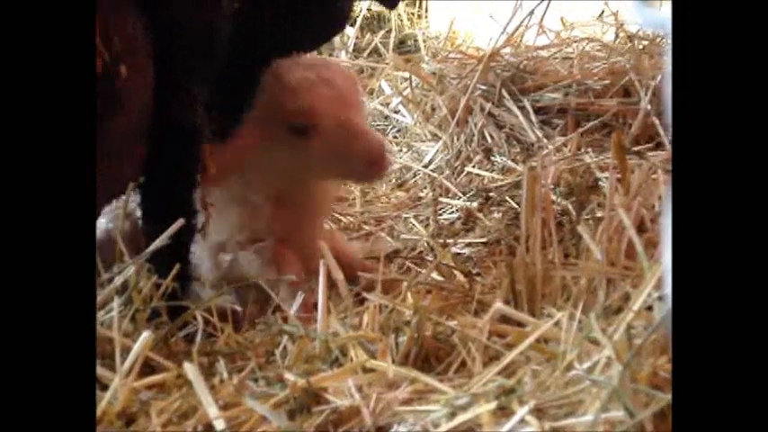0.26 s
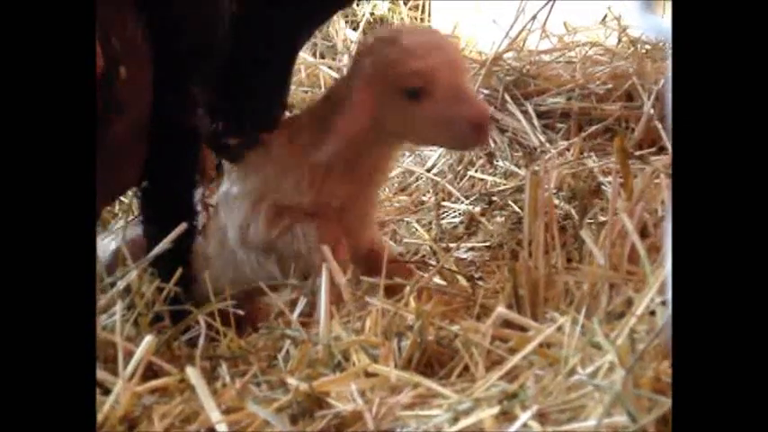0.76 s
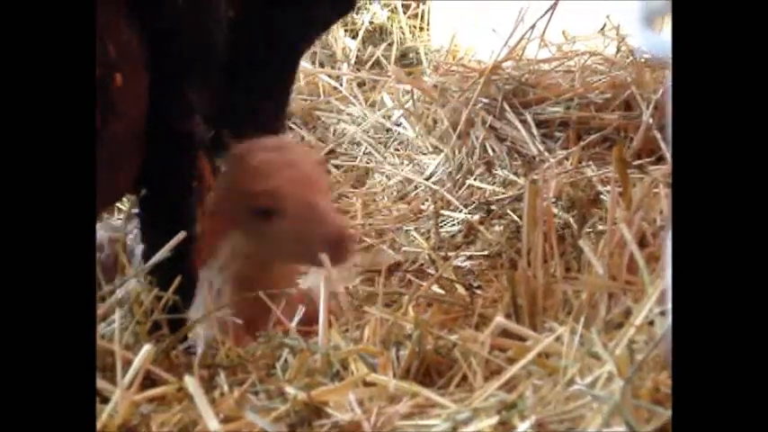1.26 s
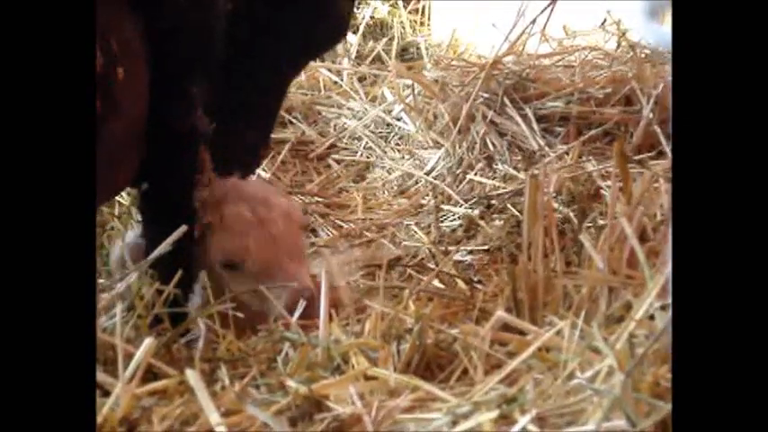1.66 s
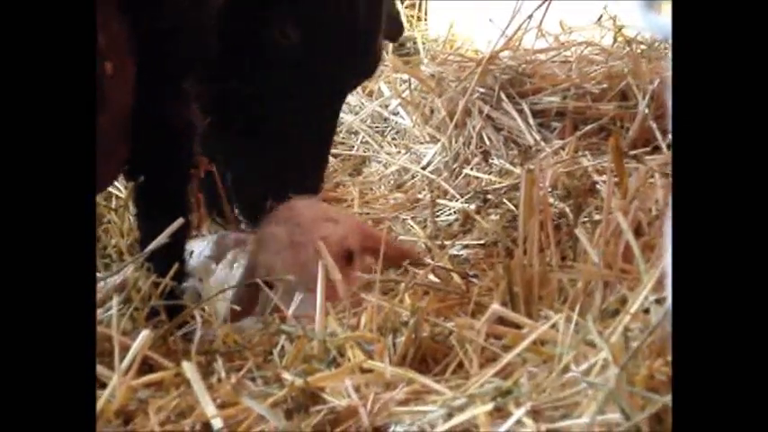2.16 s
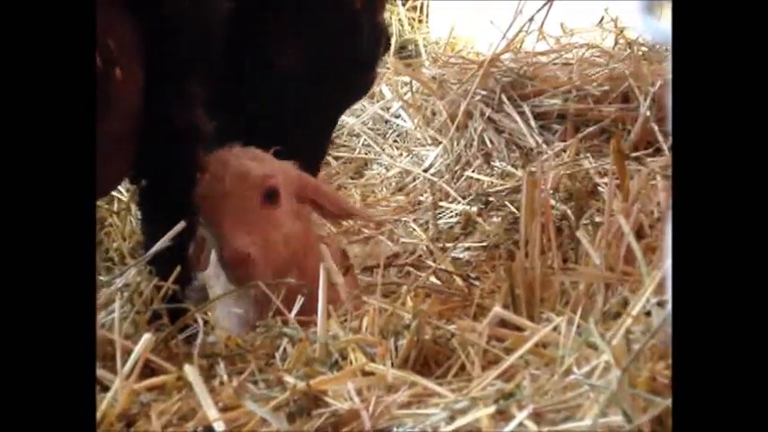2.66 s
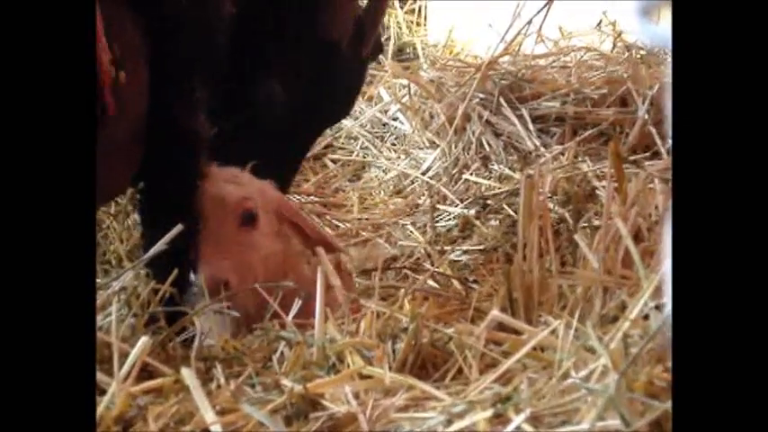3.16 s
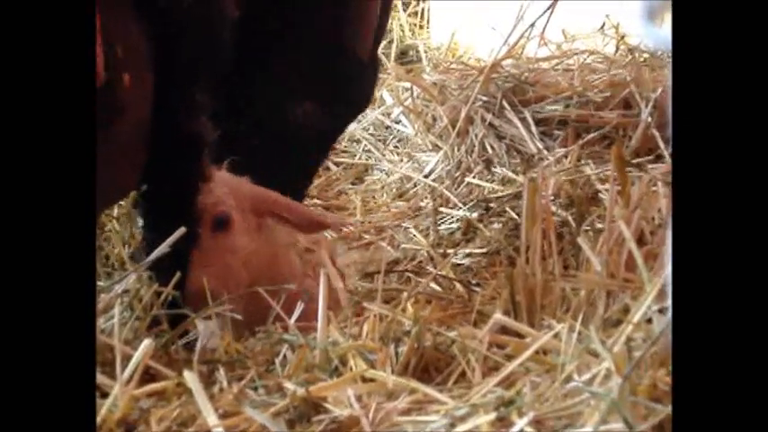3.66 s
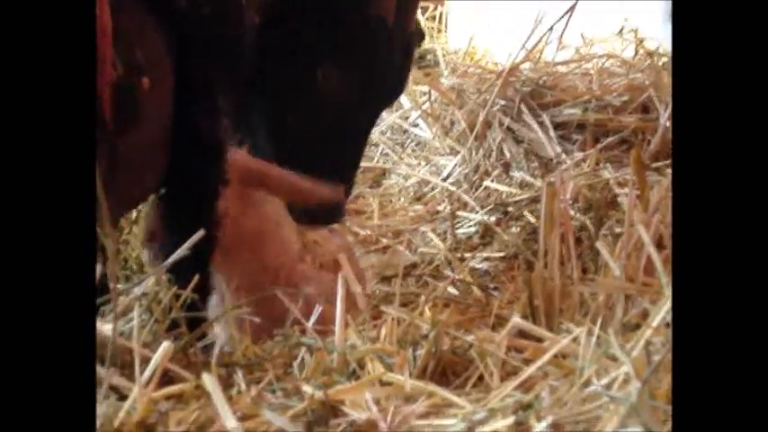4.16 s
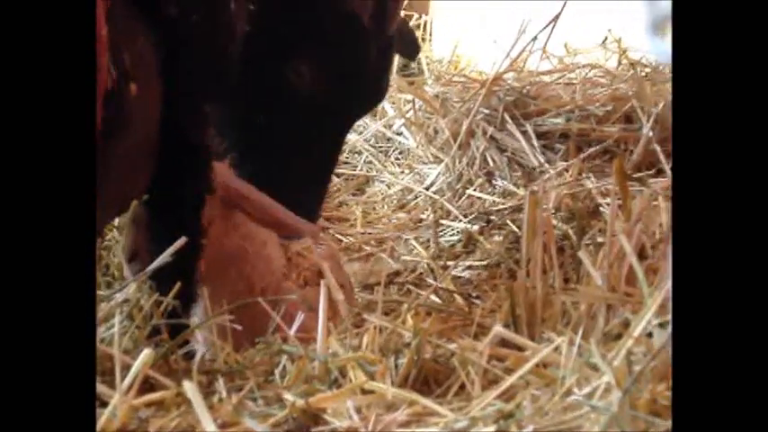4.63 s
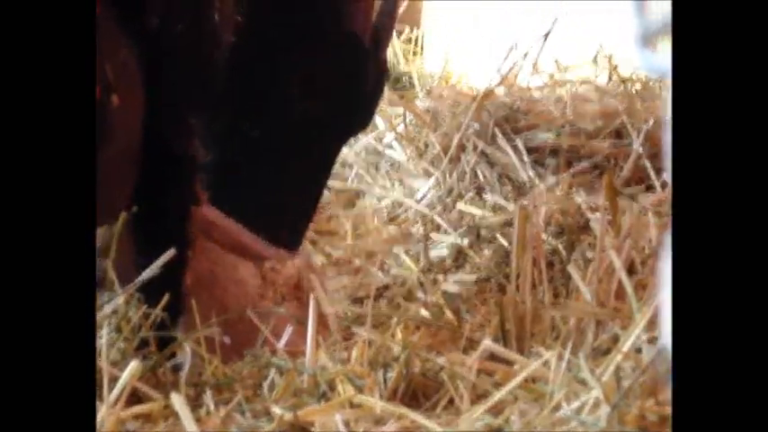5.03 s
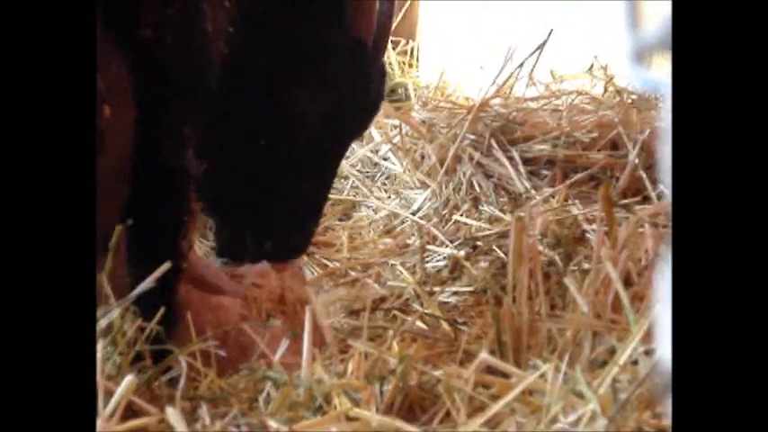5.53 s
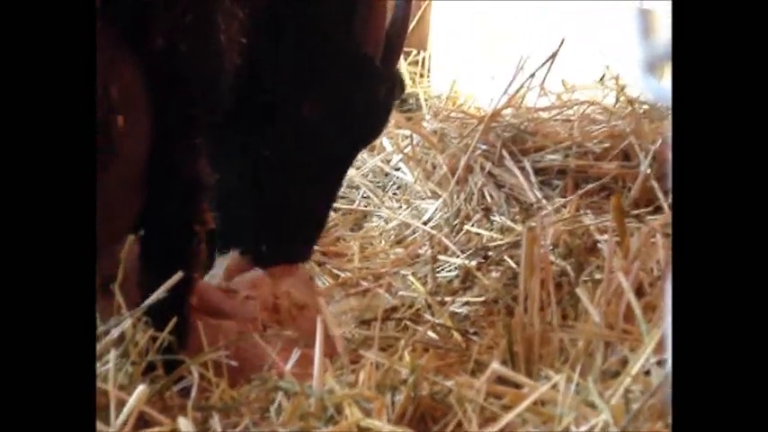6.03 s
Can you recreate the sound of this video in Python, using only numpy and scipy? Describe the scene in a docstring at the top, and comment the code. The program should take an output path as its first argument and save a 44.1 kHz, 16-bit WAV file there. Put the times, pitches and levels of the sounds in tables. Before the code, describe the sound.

In a straw-bedded barn, a quavering bleat comes from further off, then low grunts, straw ticks and a knock, then a loud close kid's bleat.

```python
"""A straw-bedded pen in a barn: a newborn kid bleats close by, after a quavering bleat from further off.
The bleats and short mews are vocal-fold partials shaped by mouth resonances; the mother's soft grunts are
slack pulses and puffs ringing chest and muzzle. Straw ticks and rustles as bursts and crackly noise, wood
knocks in two modes, dull taps run on, and a low sine thumps under the close call. A sparrow chirps outside
and a distant whine glides, both as tones; shaped noise gives the barn a steady hiss over a low hum."""
import sys
import numpy as np
from scipy import signal
from scipy.io import wavfile
from scipy.ndimage import uniform_filter1d

SR = 44100
rng = np.random.default_rng(int(sys.argv[2]) if len(sys.argv) > 2 else 0)


def log_audio(samples):
    """Write samples as a 16-bit WAV file to the path given in sys.argv[1]."""
    # one column per channel
    frames = np.atleast_2d(samples).T
    # limit to full scale, then quantise
    limited = np.clip(frames, -1, 1)
    pcm = np.round(limited * 32767).astype(np.int16)
    wavfile.write(sys.argv[1], SR, pcm)


N = 277477  # samples in the scene


def amp(db):
    """Decibels to gain."""
    return 10 ** (np.asarray(db) / 20)


def evened(x, axis=None):
    """Scaled to an rms of 1."""
    return x / np.sqrt(np.mean(x ** 2, axis, keepdims=True) + 1e-20)


def peaked(x):
    """Scaled to a peak of 1."""
    return x / abs(x).max()


def add(mix, s, sound):
    """Mixes a sound in at s seconds."""
    part = mix[round(s * SR):][:len(sound)]
    part += sound[:len(part)]


def curves(rows):
    """Sample times and the columns of a table, joined by straight lines."""
    s, *columns = np.transpose(rows)
    t = np.arange(s[0], s[-1], 1 / SR)
    return t, [np.interp(t, s, column) for column in columns]


def ring(x, hz, width_hz):
    """A resonance of gain 1 at its centre."""
    return signal.lfilter(*signal.iirpeak(hz, hz / width_hz, SR), x)


def wobble(length, hz, count=1):
    """Random drift with rms 1, smoothed over 1/hz seconds."""
    chance = rng.standard_normal((count, length))
    return evened(uniform_filter1d(chance, int(SR / hz), axis=1), axis=1)


def quavered(t, quaver, hz, effort_db):
    """Each push lifts pitch and effort together; between pushes the lowest partial fades."""
    s, strength = np.transpose(quaver)
    strength = np.interp(t, s, strength)
    cycles = np.interp(t, s, np.arange(len(s)))
    push = strength * np.tanh(2.5 * np.cos(2 * np.pi * cycles))
    lowest = amp(11 * (push - strength) + 6.0 * strength + 1.0)
    return hz * (1 + 0.062 * push), effort_db + 2.5 * push, lowest


def mouth_power(k, hz, tract, widths_hz, valley_db):
    """Power and phase lag that the resonances of mouth and throat give each partial."""
    power = lag = 0
    levels_db = [0] + tract[len(widths_hz):]
    for at, width, db in zip(tract, widths_hz, levels_db):
        detuning = (k * hz - at) / width
        # a floor between the resonances, falling above the third
        valley = amp(valley_db) ** 2 / k / (1 + (k * hz / tract[2]) ** 4)
        peak = 1 / (1 + detuning ** 2) ** 2 + valley
        lag = lag + np.arctan(detuning)  # each resonance turns the phase, so it rings after the pulse
        power = power + amp(db) ** 2 * peak / peak.sum(0)
    return power, lag


def bleat(rows, mouth, widths_hz, valley_db, rough, strain_db, drift_db, quaver=None):
    """Partials of the vocal folds, weighted by resonances that follow the mouth opening."""
    t, (effort_db, hz, opening) = curves(rows)
    tract = [np.interp(opening, np.arange(len(mouth)), column) for column in np.transpose(mouth)]
    k = np.arange(1, 25)[:, None]  # partial numbers
    lowest = amp(-5.0)  # a small mouth radiates the lowest partial poorly
    rough = np.minimum(rough + amp(effort_db - strain_db), 1)  # pushed hard, the voice turns raspy
    if quaver:
        hz, effort_db, lowest = quavered(t, quaver, hz, effort_db)
    turns = np.cumsum(hz * (1 + .015 * rough * wobble(len(t), 150)[0])) / SR
    power, lag = mouth_power(k, hz, tract, widths_hz, valley_db)

    # each partial's level drifts at random, the upper ones more
    drift = drift_db * np.minimum(k / 8, 1.6) * wobble(len(t), 22, count=len(k))
    power = power * amp(drift) ** 2
    size = np.sqrt(2 * power / power.sum(0)) * np.where(k == 1, lowest, 1)
    size = size / (1 + (k * hz / 11100.0) ** 6)  # treble roll-off

    # uneven closing smears the upper partials more than the lower
    smear = rough * np.minimum(k / 7, 1.5)
    size = size * (1 + smear * wobble(len(t), 500, count=len(k))) / np.sqrt(1 + smear ** 2)
    phase = 2 * np.pi * k * turns - 1.52 * lag - .2 * k ** 2
    sound = (size * np.cos(phase)).sum(0)
    fade = signal.windows.tukey(len(t), 0.027 / (t[-1] - t[0]))
    return t[0], amp(effort_db) * sound * fade


# the kid's call: [t/s, effort level/dB, pitch f/Hz, mouth opening as a mouth-shape row (0 = shut)]
KID_CALL = [(5.165, -36, 451.5, -0.5), (5.207, -28, 456.6, 0), (5.232, -37.5, 469, 1),
            (5.278, -26.5, 463.1, 1.5), (5.33, -28.5, 468.7, 1.37), (5.37, -24.5, 487, 1.9),
            (5.42, -21.5, 493.5, 2), (5.485, -21, 495.8, 2), (5.535, -19, 501.4, 3), (5.6, -13.5, 545.4, 4),
            (5.64, -13, 547.2, 4), (5.71, -14, 507.8, 5), (5.765, -14.5, 498.3, 5.5),
            (5.785, -20, 478.5, 5), (5.808, -13.5, 436, 6.5), (5.835, -35, 394.3, 1.5)]
# the kid's mouth, shut to wide with lips drawn back:
# [five resonances f/Hz, then level/dB of the upper four against the first]
KID_MOUTH = [(480, 1280, 2700, 4760, 8900, -15, -29, -28, -36),
             (910, 2680, 3400, 4560, 5300, 9, 6, -3.5, -16), (985, 2660, 3900, 5000, 6340, -9.5, 4, 0, -10),
             (1000, 3430, 4760, 6470, 6500, -11.5, -4.5, -14, -18),
             (1560, 2620, 3730, 5900, 6900, -1.5, 1, -5, -31),
             (1590, 2880, 4170, 6150, 7050, -5, -0.5, -4, -15),
             (1310, 2960, 4100, 6500, 7700, -5.5, -12, -12, -12.5)]


def kid_bleat():
    """The close call: five resonances open wide as the effort peaks."""
    return bleat(KID_CALL, KID_MOUTH, (200., 250., 330., 350., 450.),
                 valley_db=-24, rough=.05, strain_db=3, drift_db=3.5)


# short mews of the kid: [t/s, length/s, effort level/dB, first pitch f/Hz, last pitch f/Hz,
# mouth resonance f/Hz, level/dB of the three upper resonances against the first]
KID_MEWS = [(.135, 0.076, -35.5, 376, 400, 1290, -19, -5, -0.5),
            (.25, 0.089, -39, 467.5, 480, 940, -4, 9.5, 2),
            (5.04, 0.079, -28.5, 454, 493, 1324, 2.5, 5, 3.5)]
# upper resonances of a mew: [f/Hz]
MEW_UPPER = (2660, 4440, 6220)


def mew(s, length, effort_db, first_hz, last_hz, mouth_hz, *upper_db):
    """A bleat cut short with a fixed mouth: it swells and dies within a tenth of a second."""
    rows = [(s, effort_db, first_hz, 0), (s + length, effort_db, last_hz, 0)]
    mouth = [(mouth_hz, *MEW_UPPER, *upper_db)]
    s, sound = bleat(rows, mouth, (450., 600., 700., 900.),
                     valley_db=-14, rough=.2, strain_db=5, drift_db=2)
    return s, sound * np.sin(np.linspace(0, np.pi, len(sound))) ** 1.63


# a low thump under the loudest part of the close call: [t/s, starting level/dB, f/Hz, t60/s]
LOW_THUMP = (5.603, -35, 30., .25)


def thump(s, db, hz, t60):
    """A decaying low sine."""
    t = np.arange(0, t60, 1 / SR)
    return s, amp(db - 60 * t / t60) * np.sin(2 * np.pi * hz * t)


# the far call: [t/s, effort level/dB before the quaver, pitch f/Hz before the quaver,
# mouth opening as a mouth-shape row (0 = shut)]
FAR_CALL = [(.812, -46.5, 378.6, 0.43), (.93, -44.5, 367, 0.036), (1.0, -41.5, 379.7, 0),
            (1.03, -34.5, 392.3, 0.062), (1.09, -37, 387.5, 0.081), (1.125, -31.5, 384.6, 1.94),
            (1.35, -33.5, 377.1, 2.03), (1.46, -35.5, 363, 1.77), (1.5, -36.5, 344.4, 1.5),
            (1.66, -39.5, 328, 1.13), (1.7, -42, 305.5, 0.21), (1.74, -48, 285, 0.055),
            (1.8, -57, 275, 0.89)]
# the far mouth, shut, half open, wide:
# [four resonances f/Hz, then level/dB of the upper three against the first]
FAR_SHAPES = [(362, 1100, 3000, 3400, -13, -16.5, -18), (731, 1520, 2600, 3500, -5, -18, -24),
              (790, 1530, 2560, 3140, -4.5, -4, 1)]
# pushes of the quaver: [t/s, strength 0-1]
PUSHES = [(.87, 0.35), (.972, 0.8), (1.062, 0.7), (1.145, 1), (1.245, 1), (1.345, 0.9), (1.45, .9),
          (1.56, 0.6), (1.65, 0.2), (1.72, 0), (1.81, 0.)]


def far_bleat():
    """A rougher call with four resonances, its pitch and effort shaken by the quaver."""
    return bleat(FAR_CALL, FAR_SHAPES, (210., 250., 500., 550.),
                 valley_db=-19, rough=.36, strain_db=0, drift_db=1.8, quaver=PUSHES)


# the mother's grunts: [t/s, muzzle peak level/dB, chest level/dB against the muzzle, length/s]
MOTHER_GRUNTS = [(2.1, -40, -5.5, .06), (2.37, -28.5, 2.5, 0.074), (2.526, -26, -10, 0.066),
                 (2.671, -28, -15, 0.08), (4.047, -46.5, 7, 0.037), (4.779, -28.5, -4.5, 0.09),
                 (4.93, -24, -7, 0.081), (5.136, -32, -11, 0.029)]
# chest (first row, its level unused), then closed muzzle: [f/Hz, width of the narrower pass/Hz, level/dB]
CHEST_AND_MUZZLE = [(184, 51, 0), (400, 510, 8.5), (1000, 66, 5), (2310, 310, 5), (4190, 1100, 5),
                    (7420, 620, 0.5)]


def grunt(s, peak_db, chest_db, length):
    """Slack, uneven pulses with puffs of air ring the chest and the closed muzzle."""
    t = np.arange(0, length, 1 / SR)
    turns = np.cumsum(104 * (1 + 0.049 * wobble(len(t), 60)[0])) / SR + 0.81  # about 104 pulses a second
    pulses = np.diff(np.floor(turns), prepend=0)
    puffs = (.5 + np.exp(-(turns % 1) / 0.67)) * rng.standard_normal(len(t))
    drive = evened(pulses) + amp(-.4 * chest_db) * evened(puffs)  # the less chest, the more air
    (chest_hz, chest_width, _), *muzzle = CHEST_AND_MUZZLE
    chest = evened(ring(ring(pulses, chest_hz, chest_width), chest_hz, 2 * chest_width))
    upper = evened(sum(amp(db) * evened(ring(ring(drive, f, w), f, 3 * w)) for f, w, db in muzzle))
    shape = np.sin(np.pi * (t / length) ** 0.5)
    return s, amp(peak_db) * (peaked(shape * upper) + amp(chest_db) * peaked(shape * chest))


# a solid knock on wood: [t/s, peak level/dB]
WOOD_KNOCK = (3.4405, -18.5)
# modes of the board: [f/Hz, level/dB, t60/s]
BOARD_MODES = [(640, -0.5, 0.019), (2100, -5, 0.015)]


def knock(s, db):
    """A short blow rings two modes of a board."""
    t = np.arange(0, .04, 1 / SR)
    modes = sum(amp(d - 60 * t / t60) * np.sin(2 * np.pi * hz * t) for hz, d, t60 in BOARD_MODES)
    onset = np.minimum(t / .001, 1)
    return s, amp(db) * peaked(modes * onset)


# straw stalks snapping and small knocks: [t/s, snap peak level/dB, knock peak level/dB]
STRAW_TICKS = [(0.38, -30, -29), (0.7168, -32, -62), (0.9178, -61, -31), (1.8407, -33, -38.5),
               (3.4447, -28, -28.5), (3.986, -33, -34), (4.453, -41, -36), (4.47, -30, -34),
               (4.6557, -22, -42), (5.222, -30, -41)]


def tick(s, snap_db, knock_db):
    """A short bright snap and a longer, duller knock, both decaying noise through resonances."""
    t = np.arange(0, .04, 1 / SR)
    burst = rng.standard_normal(len(t))
    snap = peaked(ring(burst, 3460.0, 5000.0) * amp(-60 * t / 0.0093))
    dull = ring(ring(burst, 320.0, 920.0), 430.0, 1200.0)
    dull = peaked(dull * amp(-60 * t / 0.032))
    return s - .001, amp(snap_db) * snap + amp(knock_db) * dull


# a run of dull taps close by: [t/s, level/dB of the dull part]
DULL_TAPS = [(5.564, -33), (5.584, -33), (5.684, -41.5), (5.797, -39), (5.844, -41.5), (5.876, -46.5),
             (5.905, -46), (5.958, -52.5), (5.98, -45), (6.026, -44), (6.072, -46), (6.112, -47.5),
             (6.156, -44), (6.257, -40)]


def tap(s, db):
    """A broad dull click with a little treble, from one decaying noise burst."""
    t = np.arange(0, .03, 1 / SR)
    burst = rng.standard_normal(len(t)) * amp(-60 * t / 0.028)
    dull = evened(ring(ring(burst, 420.0, 1030.0), 680.0, 3380.0))
    return s - .002, amp(db) * (dull + 0.049 * evened(burst))


def noise(spectrum, patchy_db, flicker_db, size):
    """Random short-time spectra with drifting patches and a flicker shared by all bands."""
    frames, hz = 4 * N // size + 5, np.fft.rfftfreq(size, 1 / SR)
    a, b, patches = rng.standard_normal((frames, len(hz), 3)).T
    patches = uniform_filter1d(patches, size=10, axis=0)
    patches = evened(uniform_filter1d(patches, size=10, axis=1))
    f, db = np.transpose(spectrum)
    field_db = np.interp(np.log(hz + 1), np.log(f), db)[:, None] + patchy_db * patches
    z = (a + 1j * b) * amp(field_db + flicker_db * rng.standard_normal(frames))
    return evened(signal.istft(z, nperseg=size, noverlap=3 * size // 4)[1][:N])


# swells of crackly noise, one list per swell: [t/s, level/dB]; most are straw pushed about, the one at 3.44 s a
# short hiss
NOISE_SWELLS = [
    [(0.1, -49.5), (0.144, -41.5), (0.3, -48)],
    [(3.44, -38), (3.51, -43.5), (3.6, -63)],
    [(4.2, -53.5), (4.388, -46), (4.62, -50.5)],
    [(5.93, -53.5), (6.154, -50), (6.2, -72)],
]
# colour of the straw: [f/Hz, relative level/dB per Hz]
STRAW_COLOUR = [(300, -8), (800, -8.5), (4700, -2.5), (9000, -8.5), (10400, -26)]


def rustle():
    """Crackly noise under each swell: stirrings of the straw and one short hiss."""
    crackle = noise(STRAW_COLOUR, patchy_db=2.5, flicker_db=1.5, size=256)
    swell = np.zeros(N)
    for rows in NOISE_SWELLS:
        t, (db,) = curves(rows)
        add(swell, t[0], amp(db) * signal.windows.tukey(len(t), .1))
    return swell * crackle


def whistle(rows, blur_hz, fuzz):
    """A gliding tone, its level randomly blurred by distance."""
    t, (hz, db) = curves(rows)
    tone = np.sin(2 * np.pi * np.cumsum(hz) / SR) * (1 + fuzz * wobble(len(t), blur_hz)[0])
    return t[0], amp(db) * evened(tone) * signal.windows.tukey(len(t), .2)


# sparrow chirps, one list per chirp: [t/s, f/Hz, level/dB]
SPARROW_CHIRPS = [
    [(.085, 2900, -62), (.125, 3420, -58), (.15, 3500, -56)],
    [(2.15, 3390, -59), (2.18, 3810, -57), (2.2, 3410, -56), (2.27, 3320, -60)],
    [(3.73, 2900, -57.5), (3.8, 3900, -55), (3.82, 3320, -48.5), (3.86, 3090, -51), (3.91, 3050, -58)],
]


def sparrow(rows):
    """One chirp: a fast, strongly blurred glide."""
    return whistle(rows, blur_hz=350., fuzz=1.3)


# a faint distant whine: [t/s, f/Hz, level/dB]
WHINE_GLIDE = [(3.05, 582, -66), (3.3, 570, -61), (3.95, 559, -68)]


def distant_whine():
    """A slowly sinking tone with a slower, milder blur."""
    return whistle(WHINE_GLIDE, blur_hz=30.5, fuzz=0.54)


# colour of the barn air, hum to hiss: [f/Hz, relative level/dB per Hz]
AIR_COLOUR = [(20, -42), (50, -11.5), (80, -5.5), (125, 2), (160, -10), (300, -7), (900, -10.5),
              (3400, -18), (7000, -21), (10400, -31.5)]


def barn_air():
    """Steady shaped noise: a hiss over a low hum."""
    return amp(-48.5) * noise(AIR_COLOUR, patchy_db=2.5, flicker_db=1.63, size=2048)


def barn(x, t60):
    """Sparse reflections of random sign from boards and straw."""
    at = np.arange(200, 12000, 20)  # delays in samples
    taps = np.zeros(12020)
    signs = rng.choice([-1., 1.], len(at))
    taps[at + rng.integers(0, 20, len(at))] = signs * amp(-60 * at / SR / t60)
    taps = signal.lfilter([1], [1, -.45], taps)  # straw swallows the treble
    return signal.fftconvolve(x, taps / np.linalg.norm(taps))[:N]


def scene():
    """Near and far sources, their reflections, the straw and the air."""
    near, far = np.zeros(N), np.zeros(N)
    add(near, *kid_bleat())
    add(far, *far_bleat())
    events = ((KID_MEWS, mew), ([LOW_THUMP], thump), (MOTHER_GRUNTS, grunt),
              ([WOOD_KNOCK], knock), (STRAW_TICKS, tick), (DULL_TAPS, tap))
    for table, source in events:
        for row in table:
            add(near, *source(*row))
    for rows in SPARROW_CHIRPS:
        add(far, *sparrow(rows))
    add(far, *distant_whine())
    # far sources excite more of the room
    room = barn(amp(-12.0) * near + amp(-6.0) * far, t60=0.16)
    return (near + far + room + rustle() + barn_air())[None]


def record(dry):
    """A steep low-pass limits the band to 10380 Hz."""
    lowpass = signal.firwin(767, 10380, window=("kaiser", 12), fs=SR)
    return signal.oaconvolve(dry, lowpass[None], "same")


dry = scene()
out = record(dry)
log_audio(out)
```